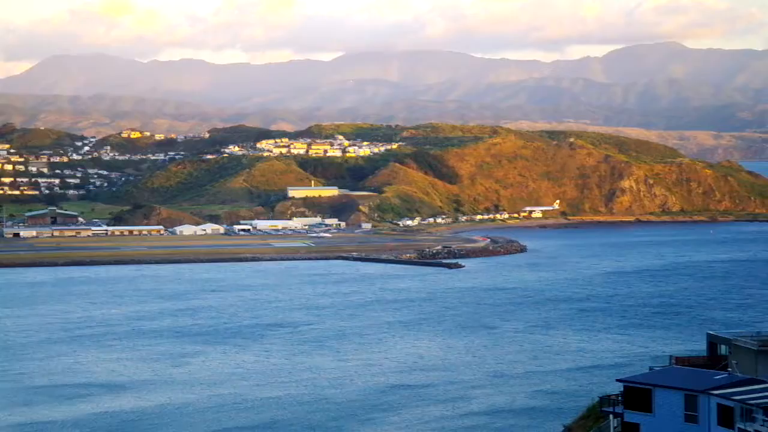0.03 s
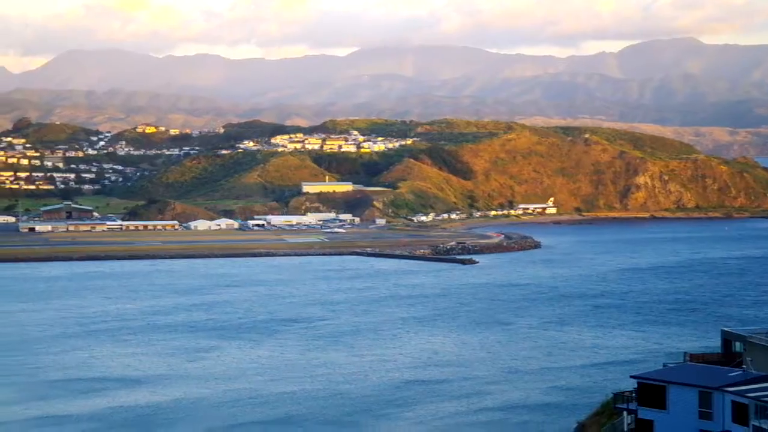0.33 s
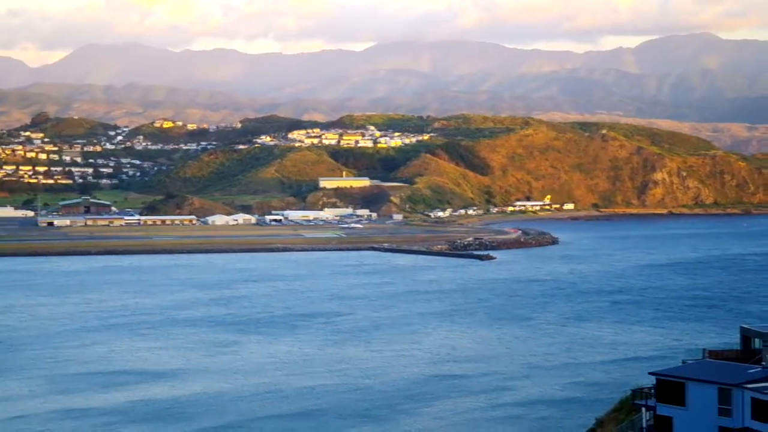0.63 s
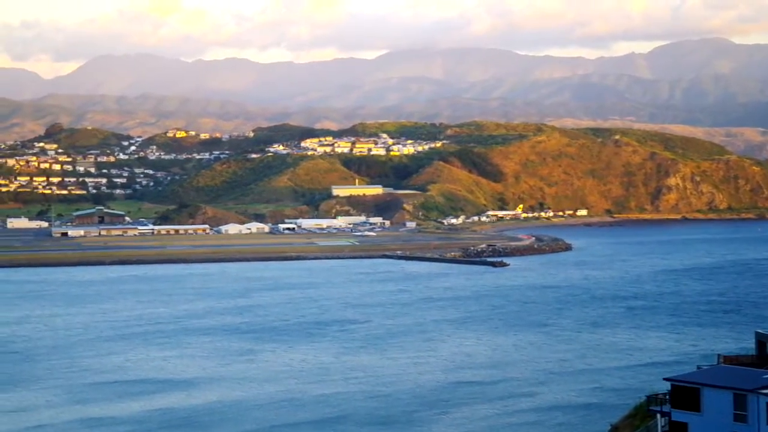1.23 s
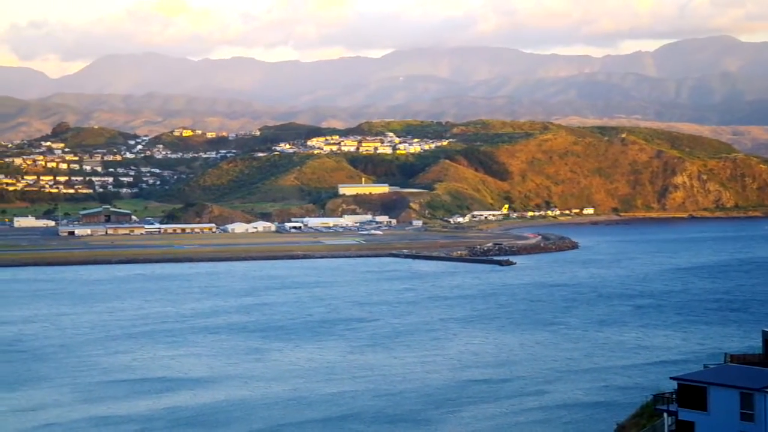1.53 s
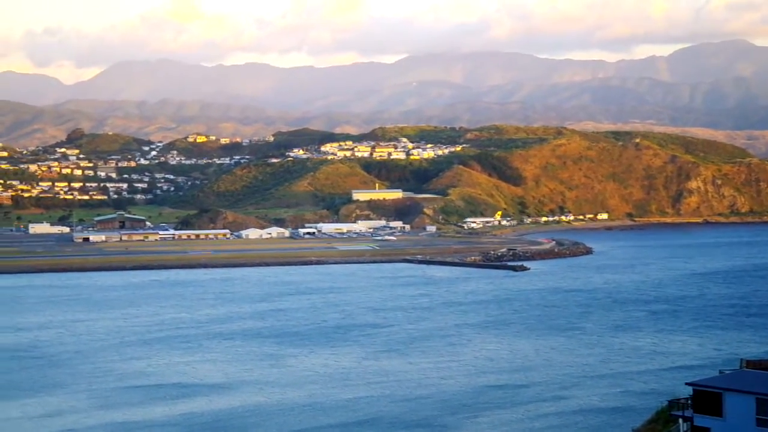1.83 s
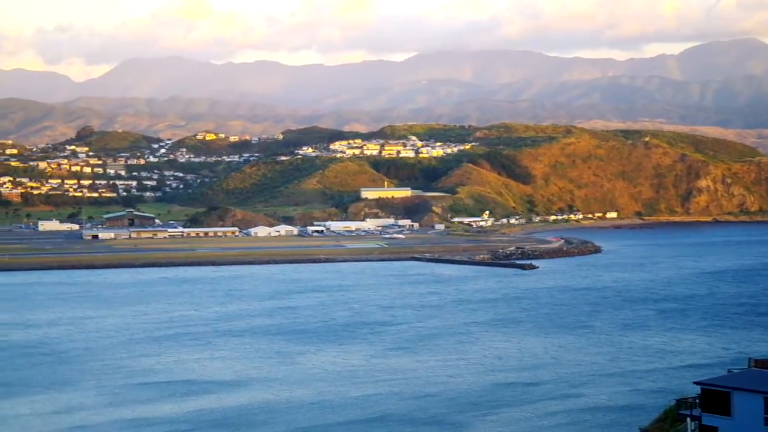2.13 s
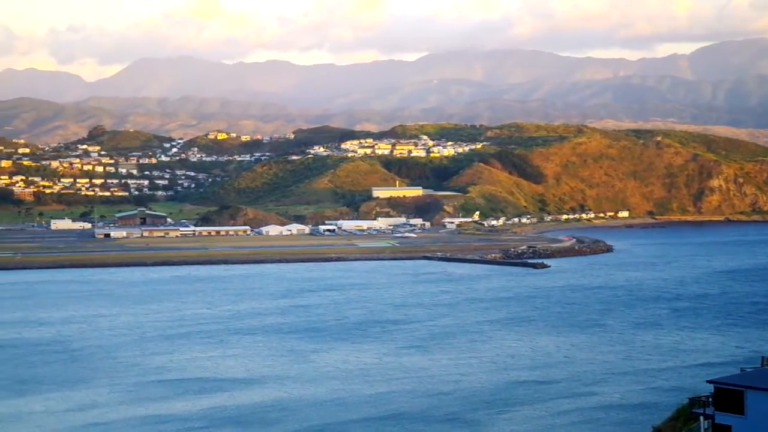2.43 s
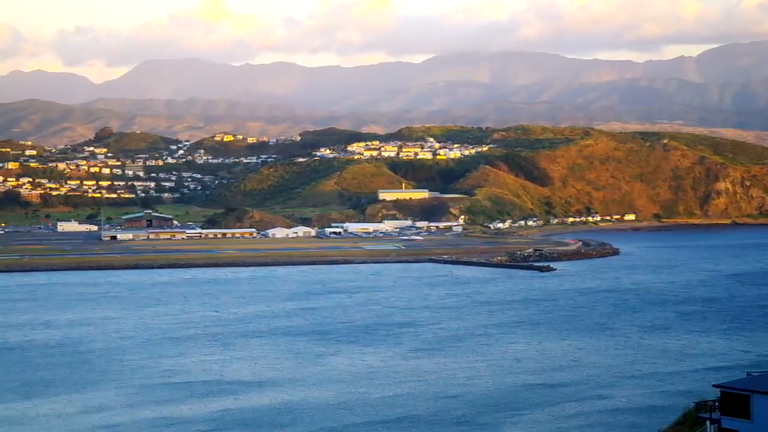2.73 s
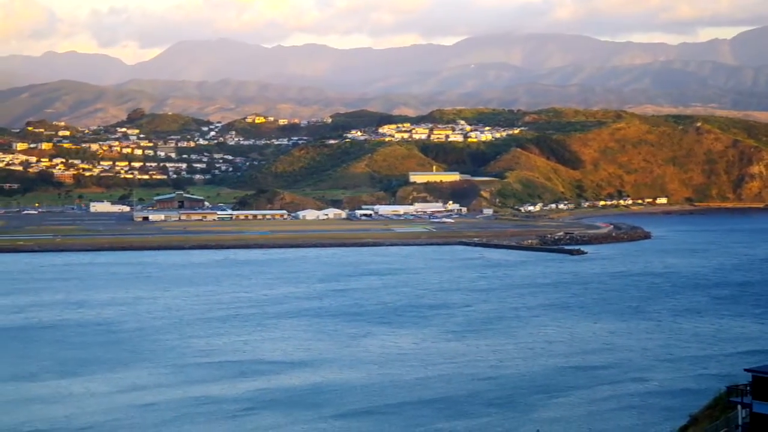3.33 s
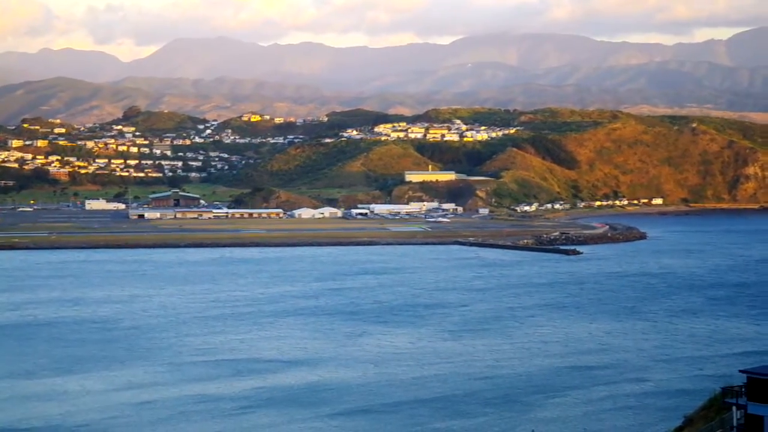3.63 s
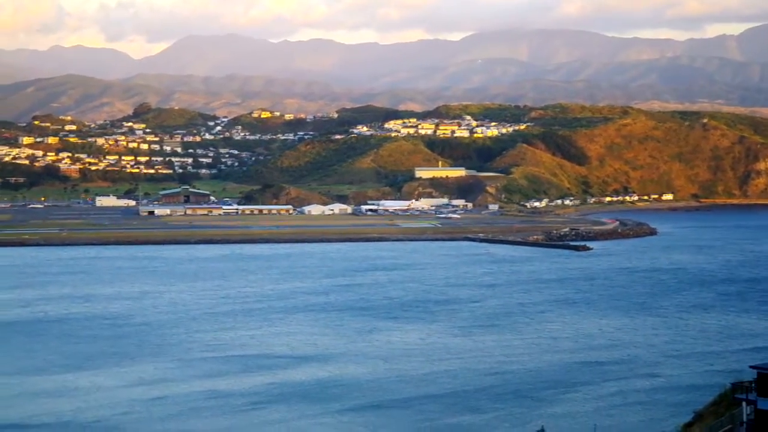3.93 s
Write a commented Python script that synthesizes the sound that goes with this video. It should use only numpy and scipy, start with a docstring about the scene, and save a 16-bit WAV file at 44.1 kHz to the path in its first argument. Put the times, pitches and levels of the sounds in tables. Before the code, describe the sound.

Faint, steady roar and whine of a faraway jet over water, with soft wind buffets.

```python
"""Airliner across the bay

Far off over open water, an airliner makes a dull steady roar with a fuzzy turbine whine that slowly
sinks. Light wind buffets the microphone, and small birds chirp faintly on the hillside.
Close by, the camera adds two short runs of lens-motor steps, hiss and a thin, quick electrical ticking."""
import sys
import numpy as np
from scipy import signal
from scipy.fft import rfft, irfft
from scipy.io import wavfile

SR = 44100
rng = np.random.default_rng(int(sys.argv[2]) if len(sys.argv) > 2 else 0)


def put_to_file(sound):
    """Save the sound as 16-bit audio at rate SR, in the file named by the first command-line argument."""
    columns = np.atleast_2d(sound).T  # one column per channel
    safe = np.clip(columns, -1, 1)
    whole_steps = np.round(safe * 32767)
    wavfile.write(sys.argv[1], SR, whole_steps.astype(np.int16))


N = 176400


def amp(db):
    return 10 ** (np.asarray(db) / 20)


def unit(x):
    """Scales to rms 1."""
    return x / np.sqrt(np.mean(abs(x) ** 2) + 1e-20)


def add(mix, start_s, sound):
    """Lays a sound into the mix at its start time."""
    part = mix[max(round(start_s * SR), 0):][:len(sound)]
    part += sound[:len(part)]


def clock():
    return np.arange(N) / SR


def noise(gain_at):
    """Noise of rms 1 whose spectrum follows a function of frequency."""
    hz = np.fft.rfftfreq(N, 1 / SR) + 1e-3
    return unit(irfft(rfft(rng.standard_normal(N)) * gain_at(hz), N))


def coloured(points):
    """Noise of rms 1 with a spectrum shaped by (Hz, dB) points."""
    hz, db = np.transpose(points)
    return noise(lambda f: amp(np.interp(np.log(f), np.log(hz), db)))


def drift(rate_hz):
    """Random wander of rms 1, up to about the given rate."""
    return noise(lambda f: 1 / (1 + (f / rate_hz) ** 4))


def fuzzy_tone(hz, width_hz, skirt=2):
    """A tone whose strength and phase are scrambled by the air it has crossed."""
    phase = 2 * np.pi * np.cumsum(hz * np.ones(N)) / SR
    a, b = (noise(lambda f: 1 / np.sqrt(1 + (2 * f / width_hz) ** (2 * skirt))) for _ in range(2))
    return unit(a * np.cos(phase) + b * np.sin(phase))


def airliner(roar_waver_db=0.74, whine_waver_db=0.2, waver_hz=9):
    """Distant exhaust roar and turbine whine, wavering over the water, with faint steady tones."""
    # The roar from across the bay. Each row: frequency in Hz, relative level in dB.
    roar_spectrum = [(20, -4), (60, 2), (120, 0.5), (220, 3), (290, 2), (400, -1.5), (510, -5.5),
                     (600, 0.5), (740, 1), (830, -2), (1050, -1), (1280, -.5), (1420, -4), (1750, -4.5),
                     (2100, -4.5), (2500, -11), (3100, -16), (3700, -19), (4100, -18), (4400, -22.5),
                     (4650, -21.5), (5200, -28), (8000, -48), (13000, -63)]
    # Its slow swell. Each row: time in seconds, level in dB.
    roar_swell = [(0, -50.5), (0.6, -50), (1.2, -51), (1.9, -50), (2.7, -50), (3.4, -51), (4, -48.5)]
    # The low middle of the roar swells on its own. Each row: time in seconds, level in dB.
    growl_swell = [(0, -69.5), (1.3, -73), (1.9, -58.5), (2.8, -54), (3.3, -61.5), (4, -58.5)]
    # The sinking turbine whine. Each row: time in seconds, pitch in Hz, level in dB.
    whine_path = [(0, 1945, -58), (0.6, 1935, -58), (1.2, 1915, -60), (1.55, 1920, -55.5), (1.9, 1925, -57),
                  (2.25, 1890, -56), (2.85, 1875, -56), (3.15, 1895, -58.5), (3.45, 1875, -60.5),
                  (3.7, 1885, -53.5), (4, 1860, -57)]
    # Steady machine tones. Each row: pitch in Hz, level in dB.
    machine_tones = [(1122, -74), (2827, -80.5), (4101, -86)]
    t = clock()
    roar = coloured(roar_spectrum)
    roar *= amp(np.interp(t, *np.transpose(roar_swell)) + roar_waver_db * drift(waver_hz))
    times, whine_hz, whine_db = np.transpose(whine_path)
    whine = fuzzy_tone(np.interp(t, times, whine_hz), width_hz=82, skirt=2.16)
    whine *= amp(np.interp(t, times, whine_db) - whine_waver_db * drift(waver_hz))
    growl = fuzzy_tone(559.7, width_hz=560) * amp(np.interp(t, *np.transpose(growl_swell)))
    tones = sum(amp(db) * fuzzy_tone(hz, width_hz=17) for hz, db in machine_tones)
    return roar + whine + growl + tones


def eddies(centre_hz, low_slope=1.25, high_slope=2.06):
    """Low turbulence at the microphone, falling away on both sides of its centre."""
    return noise(lambda f: 1 / np.hypot((centre_hz / f) ** low_slope, (f / centre_hz) ** high_slope))


def wind(breeze_db=-57, lumps_db=3, lumps_hz=7):
    """A lumpy breeze on the microphone, and buffets that swell and die away."""
    # Buffets. Each row: peak time in seconds, length in seconds, level in dB, centre frequency in Hz.
    gusts = [(0.15, 0.11, -43, 61), (0.34, 0.063, -42, 61), (0.498, .13, -51.5, 228),
             (0.55, 0.048, -47, 75), (0.94, 0.035, -47, 62), (1.04, 0.046, -46.5, 67),
             (1.12, 0.036, -48, 60), (1.34, 0.038, -46, 54.7), (1.653, 0.12, -48.5, 70),
             (1.82, 0.15, -44.5, 106), (2.123, 0.11, -44, 94), (2.323, 0.11, -45.5, 58.4),
             (2.413, 0.078, -41, 89), (2.586, 0.12, -50, 75), (2.796, 0.072, -41.5, 113),
             (2.90, 0.18, -46, 99), (3.116, 0.078, -48.5, 190), (3.33, 0.062, -59, 60),
             (3.666, 0.08, -48, 150), (3.756, 0.042, -49.5, 90), (3.89, 0.068, -51.5, 90)]
    t = clock()
    rumble = eddies(centre_hz=53.8) * amp(breeze_db + lumps_db * drift(lumps_hz))
    for peak_s, length_s, db, centre_hz in gusts:
        swell = np.exp(-2 * ((t - peak_s) / length_s) ** 2)
        rumble += amp(db) * swell * eddies(centre_hz)
    return rumble


def birds(warble_depth=0.013, rasp_depth=0.57, echo_t60_s=0.59, echo_db=-2.5):
    """Small birds call in short hoarse glides, smeared by echoes from the hillside."""
    # Chirps. Each row: start and length in seconds, first and last pitch in Hz, level in dB.
    chirps = [(0.645, 0.043, 4600, 4150, -74), (0.745, 0.063, 4000, 3460, -69),
              (1.52, 0.04, 2940, 2940, -68), (1.76, 0.043, 3260, 3250, -65.5),
              (1.77, 0.082, 2830, 2870, -66.5), (1.92, 0.088, 2900, 2840, -65),
              (1.92, 0.04, 3200, 3470, -67), (1.99, 0.12, 3290, 3500, -68), (3.05, 0.033, 4700, 4570, -72),
              (3.08, 0.096, 3950, 4670, -71), (3.155, .035, 4700, 4450, -69), (3.194, .08, 4060, 3370, -71),
              (3.25, .05, 4450, 3850, -72), (3.33, .05, 3800, 4380, -74), (3.47, 0.042, 4320, 3900, -72),
              (3.52, .06, 4500, 3850, -71), (3.536, 0.018, 5340, 5650, -72)]
    warble = 1 + warble_depth * drift(rate_hz=90)
    rasp = 1 + rasp_depth * drift(rate_hz=130)
    hillside = rng.standard_normal(SR) * amp(-60 * clock()[:SR] / echo_t60_s)
    direct = np.zeros(N)
    for start_s, length_s, first_hz, last_hz, db in chirps:
        progress = np.linspace(0, 1, int(length_s * SR))
        span = int(start_s * SR) + np.arange(len(progress))
        hz = (first_hz + (last_hz - first_hz) * progress) * warble[span]
        envelope = np.sqrt(progress * (1 - progress)) * rasp[span]
        chirp = envelope * np.sin(2 * np.pi * np.cumsum(hz) / SR)
        add(direct, start_s, amp(db) * unit(chirp))
    echoes = signal.fftconvolve(direct, hillside / np.linalg.norm(hillside))[:N]
    return direct + amp(echo_db) * echoes


def lens_motor(step_s=0.015, click_decay_s=0.0075):
    """Each step rattles the lens barrel as it starts and stops, with a brief whirr between."""
    # Motor steps. Each row: start in seconds, then starting click, stopping click and whirr in dB.
    steps = [(0.609, -59, -59, -64), (0.713, -60, -61, -65), (0.8092, -50, -55, -68),
             (0.911, -65, -54, -65), (1.0081, -52.5, -59, -67), (1.109, -60, -54, -65),
             (3.7419, -49.5, -54, -64), (3.843, -59, -56, -65), (3.9415, -56.5, -54, -64)]
    # The ring of the barrel. Each row: frequency in Hz, relative level in dB.
    barrel_spectrum = [(300, -33), (1200, -0.5), (2200, 3.5), (2900, -9), (3800, -4), (4200, 5.5),
                       (4430, -7), (4670, 5.5), (4900, -6), (6500, -8), (7100, -12), (7600, -16),
                       (9000, -14.5), (13000, -26)]
    # The whirr of the motor. Each row: frequency in Hz, relative level in dB.
    whirr_spectrum = [(2000, -29), (4000, -10), (8000, 8), (9000, -14), (10600, 8), (11700, 5), (12030, 18),
                      (12350, -13), (13000, -49)]
    t = clock()[:SR // 10]
    ring = np.exp(-t / click_decay_s)
    swell = np.sin(np.pi * np.minimum(t / step_s, 1)) ** 2
    click_envelope, whirr_envelope = np.zeros((2, N))
    for start_s, start_db, stop_db, whirr_db in steps:
        add(click_envelope, start_s, amp(start_db) * ring)
        add(click_envelope, start_s + step_s, amp(stop_db) * ring)
        add(whirr_envelope, start_s, amp(whirr_db) * swell)
    return click_envelope * coloured(barrel_spectrum) + whirr_envelope * coloured(whirr_spectrum)


def electrical_ticking(pips_per_s=33.28, first_s=0.0188, sigma_s=0.00092, pitch_hz=9880):
    """A regular train of tiny high pips from the camera, each with its own level and phase."""
    level_db, spread_db = -64.5, 0.8
    t = clock()
    pip_index, position = np.divmod((t - first_s) * pips_per_s + 0.5, 1)
    strength, phase = rng.standard_normal((N // 1000, 2))[pip_index.astype(int)].T
    from_peak_s = (position - 0.5) / pips_per_s
    envelope = amp(level_db + spread_db * strength) * np.exp(-0.5 * (from_peak_s / sigma_s) ** 2)
    return envelope * np.sin(2 * np.pi * (pitch_hz * t + phase))


def microphone_hiss(level_db=-68.5):
    """The microphone's own even hiss, under everything else."""
    # The colour of the hiss. Each row: frequency in Hz, relative level in dB.
    hiss_spectrum = [(20, -3), (3000, -6.5), (5500, 0), (7500, -1.5), (9000, -3), (10600, -2.5),
                     (12800, -4.5)]
    return amp(level_db) * coloured(hiss_spectrum)


def scene():
    """The bay, the hillside and the camera, heard at one microphone."""
    return (airliner() + wind() + birds() + lens_motor() + electrical_ticking() + microphone_hiss())[None]


def record(dry, open_s=0.034, fade_s=0.024, cutoff_hz=12780):
    """The input opens quickly, loses its top treble and settles on a constant offset."""
    offset_height, offset_start_s, offset_rise_s = 0.029, 0.047, 0.0107
    t = clock()
    opened = dry * np.clip((t - open_s) / fade_s, 0, 1)
    offset = offset_height * np.clip((t - offset_start_s) / offset_rise_s, 0, 1)
    low_pass = signal.firwin(511, cutoff_hz, window=("kaiser", 9), fs=SR)
    return offset + signal.oaconvolve(opened, low_pass[None], "same")


dry = scene()
out = record(dry)
put_to_file(out)
```